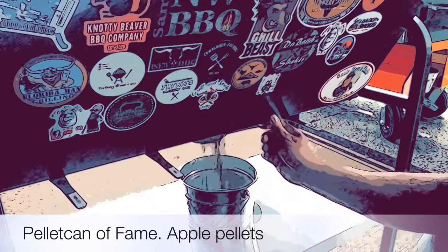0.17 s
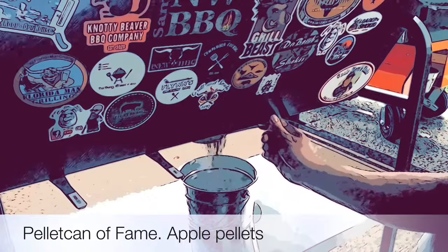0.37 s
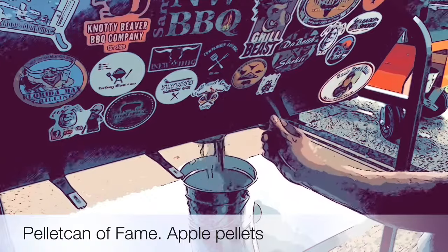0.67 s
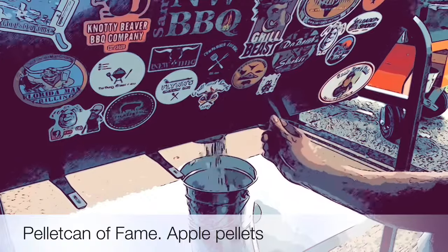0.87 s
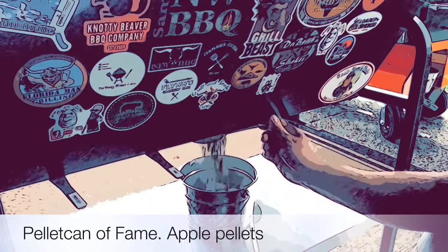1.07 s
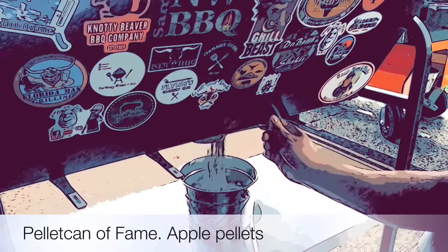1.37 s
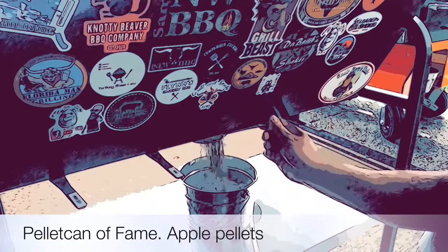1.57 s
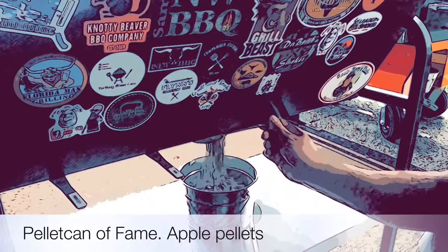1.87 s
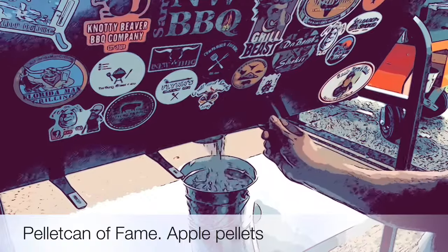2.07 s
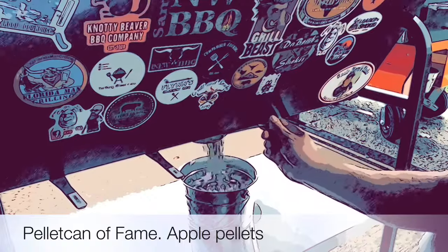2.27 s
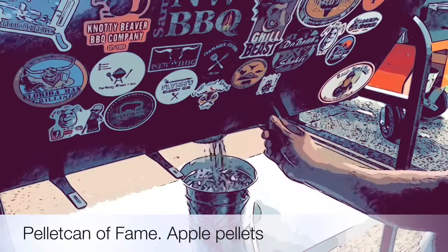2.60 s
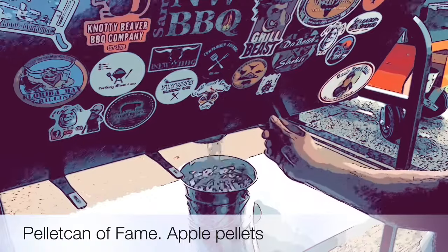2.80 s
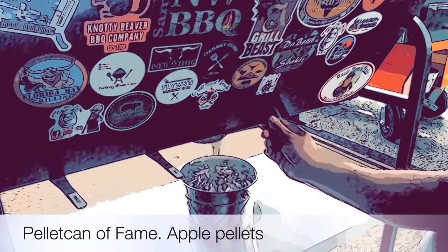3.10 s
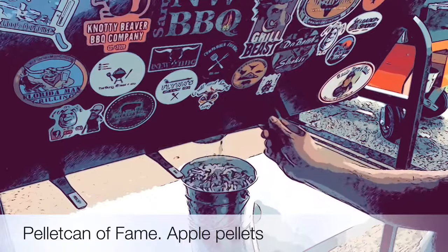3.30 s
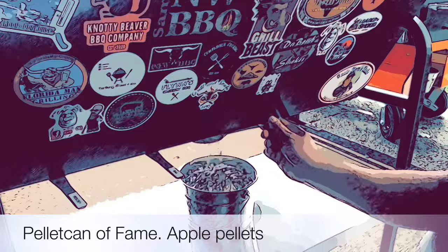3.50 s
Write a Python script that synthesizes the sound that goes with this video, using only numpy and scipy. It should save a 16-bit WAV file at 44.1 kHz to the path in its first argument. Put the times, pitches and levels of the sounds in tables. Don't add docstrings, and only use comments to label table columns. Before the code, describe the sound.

Wood pellets pour from a chute into a small metal can, bursting in loud and distorted, ringing the bare metal, then thinning to dry cracks and ticks; close phone microphone outdoors, faint hum.

```python
import sys
import numpy as np
from scipy import signal
from scipy.fft import rfft, irfft
from scipy.io import wavfile
from scipy.ndimage import uniform_filter1d

SR = 44100
rng = np.random.default_rng(int(sys.argv[2]) if len(sys.argv) > 2 else 0)


def file_out(sig):
    cols = np.atleast_2d(sig).T
    lim = np.clip(cols, -1, 1)
    pcm = np.round(lim * 32767).astype(np.int16)
    wavfile.write(sys.argv[1], SR, pcm)


def volts_from_db(level):
    exponent = np.asarray(level, float) / 20
    return 10 ** exponent


N = 160965


def read(points, hz):
    f, value = np.transpose(points)
    return np.interp(np.log(hz + 1), np.log(f + 1), value)


def evened(x):
    return x / np.sqrt(np.mean(x ** 2) + 1e-20)


def smooth_twice(x, size):
    return uniform_filter1d(uniform_filter1d(x, size), size)


def colour(x, points):
    length = x.shape[-1]
    hz = np.fft.rfftfreq(length, 1 / SR)
    return irfft(rfft(x) * volts_from_db(read(points, hz)), length)


def add(mix, s, sound):
    part = mix[round(s * SR):][:len(sound)]
    part += sound[:len(part)]


def resonate(x, hz, width):
    r = np.exp(-np.pi * width / SR)
    pole = r * np.exp(2j * np.pi * hz / SR)
    return 2 * signal.lfilter([1 - r], [1, -pole], x).real


def flow():
    # (time [s], level [dB])
    pour = [(0, -8.5), (.1, -9.5), (.125, -16.5), (.3, -20.5), (.4, -22), (.55, -18.5), (.8, -20.5),
            (1.05, -23), (1.2, -24), (1.5, -25.5), (2, -28), (2.33, -32), (2.6, -29), (3.1, -33.5),
            (3.2, -38), (3.45, -36), (3.65, -44)]
    return volts_from_db(np.interp(np.arange(N) / SR, *np.transpose(pour)))


def hail(count=24):
    ticks_per_s, spread_db, t60_s, surge_db = 1500, 3, 0.017, 0.6
    t = np.arange(1024) / SR
    lands = rng.random(N) < ticks_per_s / SR
    size = lands * volts_from_db(spread_db * np.minimum(rng.exponential(1, N), 4))
    kind = rng.integers(0, count, N)
    out = np.zeros(N)
    for k in range(count):
        hz = rng.uniform(100, 17000, (30, 1))
        phase = rng.random((30, 1))
        tick = np.sin(2 * np.pi * (hz * t + phase)).sum(0) * volts_from_db(-60 * t / t60_s)
        out += signal.oaconvolve(size * (kind == k), tick)[:N]
    surge = evened(smooth_twice(rng.standard_normal(N), 500))
    return evened(out) * volts_from_db(surge_db * surge)


def heap_hail(pour):
    # (frequency [Hz], level [dB per Hz])
    wooden_tone = [(400, -10), (1400, -3.5), (3000, 0.5), (6500, 1), (9200, 1.5), (9900, -9), (13500, -7),
                   (15600, -16)]
    return pour * evened(colour(hail(), wooden_tone))


def bare_metal(rain, pour):
    # (frequency [Hz], level [dB per Hz])
    metal_tone = [(40, -23), (200, -19), (620, 4), (1200, -2), (2700, 4), (9200, -5), (9900, -14),
                  (15600, -46)]
    start_db, fall_db_per_s = 4.5, -9
    covering = volts_from_db(start_db + fall_db_per_s * np.arange(N) / SR)
    return pour * covering * evened(colour(rain, metal_tone))


def can_body(rain, pour):
    # (frequency [Hz], width [Hz], level [dB], change [dB/s])
    can_tones = [(264.5, 11, -10, -0.5), (395.2, 12, -4, -1.5), (582, 56, 3.5, -6.5), (680, 48, -0.5, -2),
                 (973, 20, 1.5, -6.5), (1420, 6.7, 0, -0.5), (1556, 9.2, -10.5, 2.5), (1810, 13, -2.5, -2),
                 (2090, 38, 2, -3.5), (2290, 13, 5.5, -4), (2645, 11, -1, -0.5), (3250, 160, 3, 1)]
    t = np.arange(N) / SR
    drive = (rain + 0.85 * rng.standard_normal(N)) * pour * volts_from_db(-8.5)
    out = np.zeros(N)
    for hz, width, db, change in can_tones:
        even_width = np.sqrt(SR / (100 * width))
        out += volts_from_db(db + change * t) * resonate(drive, hz, width) * even_width
    return out


def hollow(x):
    start_hz, rise_hz_per_s, width_hz, level_db = 2610, 254, 326, -6
    hz = start_hz + rise_hz_per_s * np.arange(N) / SR
    turn = np.exp(2j * np.pi * np.cumsum(hz) / SR)
    r = np.exp(-np.pi * width_hz / SR)
    ringing = turn * signal.lfilter([1 - r], [1, -r], x / turn)
    return x + volts_from_db(level_db) * 2 * ringing.real


def drone():
    # (time [s], frequency [Hz], level [dB])
    bottom_tone = [(0.0, 261.6, -28.5), (0.28, 259.9, -39), (3.65, 267.2, -58.5)]
    t = np.arange(N) / SR
    s, hz, db = np.transpose(bottom_tone)
    waver_db = evened(smooth_twice(rng.standard_normal(N), 1500))
    wave = np.sin(2 * np.pi * np.cumsum(np.interp(t, s, hz)) / SR)
    return np.sqrt(2) * volts_from_db(np.interp(t, s, db) + waver_db) * wave


def outdoor_air():
    # (frequency [Hz], level [dB per Hz])
    air_tone = [(20, -5), (60, -2.5), (130, -3.5), (300, 0.5), (690, -3.5), (1300, -7), (5000, -19),
                (15500, -14)]
    mid, side = volts_from_db(-41.5) * evened(colour(rng.standard_normal((2, N)), air_tone))
    side = volts_from_db(-25) * signal.lfilter(*signal.butter(2, 700, fs=SR), side)
    return mid + np.array([side, -side])


def opening_side_noise():
    # (frequency [Hz], width [Hz])
    split_bands = [(5700, 560), (8500, 500)]
    level_db, length_s = -9, 0.028
    split = sum(resonate(rng.standard_normal(N), hz, width) for hz, width in split_bands)
    fade = np.maximum(1 - np.arange(N) / SR / length_s, 0)
    side = volts_from_db(level_db) * evened(split) * fade
    return np.array([side, -side])


def clump(s, db, t60, pitch):
    # (frequency [Hz], level [dB per Hz])
    crack_tone = [(500, -33), (1900, -10.5), (3600, -5), (9200, -2.5), (9900, -10.5), (13500, -13),
                  (15600, -22.5)]
    level_db, scatter_db, grit_db, snap_db, snap_db_per_s = -6, -1.5, 0, 6.5, -74
    pitch_db, pitch_width, lumpy_db = 4.5, 0.16, 3
    rise_s, snap_t60_s, full_t60_s, spread_share = 0.0004, 0.01, 0.062, 0.04
    t = np.arange(8192) / SR
    hz = np.fft.rfftfreq(8192, 1 / SR)
    noise, grit, lumps = rng.standard_normal((3, 8192))
    tone = read(crack_tone, hz)
    tone += pitch_db * np.exp(-0.5 * (np.log((hz + 1) / pitch) / pitch_width) ** 2)
    tone += lumpy_db * evened(smooth_twice(lumps, 150))[:len(hz)]
    body = evened(irfft(rfft(noise) * volts_from_db(tone)))
    gritty = volts_from_db(grit_db * evened(uniform_filter1d(grit, 50)))
    build = min(t60 / full_t60_s, 1) * (1 - np.exp(-t / (spread_share * t60)))
    scatter = build * gritty * volts_from_db(scatter_db - 60 * t / t60)
    snap = body * np.minimum(t / rise_s, 1) * volts_from_db(-60 * t / snap_t60_s)
    snap = volts_from_db(snap_db + snap_db_per_s * t60) * snap / abs(snap).max()
    return s - rise_s, volts_from_db(db + level_db) * (snap + body * scatter)


def clumps():
    # (time [s], peak [dB], scatter time to fall 60 dB [s],
    # pitch [Hz])
    clump_landings = [(0.1784, 4, 0.093, 3380), (0.2487, 1, 0.049, 5100), (0.34, 0, 0.054, 8400),
                      (0.433, -10, .04, 2400), (0.4798, -3.5, 0.078, 3030), (0.518, -18, .03, 3000),
                      (0.528, 3.5, 0.13, 5100), (0.5581, 3, 0.1, 4630), (0.612, -16, 0.039, 8000),
                      (0.6485, -1, 0.14, 5500), (.69, -1.5, 0.048, 8600), (0.72, -0.5, 0.06, 8600),
                      (.749, 4, 0.062, 5200), (0.773, -1.5, 0.096, 7000), (0.8091, 4, 0.24, 6000),
                      (0.87, -8, 0.045, 8000), (0.8798, 3.5, 0.12, 3000), (0.926, 2.5, 0.11, 7700),
                      (0.962, 2, 0.083, 6900), (1.009, -5, 0.071, 5450), (1.066, -27, .04, 6400),
                      (1.0869, -1.5, 0.093, 9150), (1.101, 0, 0.12, 8540), (1.1213, 2.5, 0.082, 6300),
                      (1.166, -8.5, .05, 2800), (1.2155, -1, 0.13, 8850), (1.2483, 0, 0.098, 6350),
                      (1.2958, -1.5, 0.039, 3600), (1.336, -12, .04, 6000),
                      (1.366, -2.5, 0.11, 6140), (1.419, 3.5, 0.079, 5950), (1.471, -3, 0.058, 6500),
                     (1.5112, -4.5, 0.027, 3070), (1.5342, -3.5, 0.13, 2600), (1.5535, -2.5, 0.078, 5830),
                     (1.579, -6.5, 0.076, 5950), (1.599, -2.5, 0.14, 6370), (1.621, -5.5, 0.095, 6640),
                     (1.6664, -2.5, 0.071, 5860), (1.682, -2, 0.09, 6300), (1.7172, -5, 0.1, 6700),
                     (1.7536, -3, 0.044, 5400), (1.7757, -5, .064, 6500), (1.799, -2, 0.066, 7000),
                     (1.8065, -3.5, 0.097, 6500), (1.838, -1, 0.043, 8100), (1.847, -1.5, 0.045, 7900),
                     (1.883, -9, 0.073, 6030), (1.9127, -8.5, 0.091, 8340), (1.929, -9, 0.032, 6460),
                     (1.95, -4.5, .05, 9000), (1.9755, -6, 0.05, 6600), (2.0055, -9, 0.046, 4310),
                     (2.0175, -4.5, 0.066, 7700), (2.0649, -14, 0.069, 6410), (2.087, -9.5, 0.06, 7160),
                     (2.1, -1, 0.056, 7030), (2.141, -9, 0.062, 9400), (2.149, -8.5, 0.056, 8500),
                     (2.158, -13, 0.041, 3200), (2.1827, 0, 0.043, 5000), (2.204, -5, 0.055, 8790),
                     (2.2352, -5, 0.047, 7180), (2.2543, -10, .04, 8980), (2.267, -12.5, 0.066, 8050),
                     (2.293, -9, 0.048, 3680),
                      (2.313, -11, 0.052, 7900), (2.3476, -2.5, 0.057, 8200), (2.3708, -5, 0.067, 9040),
                   (2.4142, -1.5, 0.052, 8600), (2.487, -4, 0.031, 8700), (2.5199, -2, 0.063, 8600),
                   (2.635, -15, 0.041, 5500), (2.6506, -6, 0.07, 5170), (2.693, 1, 0.073, 8600),
                   (2.738, -3.5, 0.055, 6100), (2.784, -15.5, 0.071, 8850), (2.8142, -27, .02, 6350),
                   (2.83, -2.5, 0.039, 6450), (2.8477, -12, 0.084, 7540), (2.879, -10.5, .03, 8560),
                   (2.8924, -7.5, 0.07, 3720), (2.9374, -6.5, 0.058, 7700), (2.9883, -12.5, 0.062, 8200),
                   (3.0135, -6, 0.039, 5400), (3.0652, -13, 0.042, 4360), (3.096, -7, .1, 3700),
                   (3.157, -12.5, .015, 7900), (3.218, -13, 0.028, 5600), (3.2493, -8.5, 0.053, 8740),
                   (3.2708, -13, 0.062, 3580), (3.333, -7, 0.053, 4400), (3.4165, -12, 0.023, 2870),
                   (3.515, -13, 0.073, 5080), (3.539, -6.5, 0.042, 3840), (3.6089, -14, 0.029, 2770)]
    # (time [s], peak [dB], pitch [Hz])
    further_landings = [(0.289, -17, 9000), (.365, -4, 5900), (0.836, -6, 5000), (1.253, 1.5, 5960),
                        (1.3027, 1.5, 5840), (1.413, -3.5, 3000), (2.1113, -4, 8500), (2.382, -7.5, 7540),
                        (2.423, -9, 8500), (2.478, -26, 8000), (2.526, -6.5, 6000), (2.5707, -12.5, 3000),
                        (2.688, -12, 6000), (2.7, -11, 3570), (2.7401, -5, 9000), (3.0242, -12, 3770),
                        (3.1327, -18, 2800), (3.385, -18.5, 3250), (3.5451, -12.5, 5000), (3.623, -15, 8500),
                        (3.636, -16, 3900)]
    out = np.zeros(N)
    for row in clump_landings:
        add(out, *clump(*row))
    for s, db, pitch in further_landings:
        add(out, *clump(s, db, 0.071, pitch))
    return out


def knock(s, db, hz):
    level_db, t60_s = -3, 0.027
    t = np.arange(4096) / SR
    wave = np.sin(2 * np.pi * hz * t)
    wave += 0.65 * np.sin(2 * np.pi * 1.415 * hz * t)
    wave += 0.5 * np.sin(2 * np.pi * 0.64 * hz * t)
    return s - 0.001, volts_from_db(db + level_db - 60 * t / t60_s) * np.minimum(t / 0.0022, 1) * wave / 2


def knocks():
    # (time [s], peak [dB], pitch [Hz])
    bottom_blows = [(.195, -2, 700), (.232, 0, 680), (0.26, 3, 655), (0.318, 2.5, 540), (0.432, 5.5, 655),
                    (0.777, -4, 657), (0.809, -4, 663), (0.879, -10, 1450), (1.919, -11, 1420),
                    (2.181, -13, 1900), (3.413, -13, 1515), (3.414, -11, 2730)]
    out = np.zeros(N)
    for row in bottom_blows:
        add(out, *knock(*row))
    return out


def rim(s, db, share):
    # (frequency [Hz], level [dB], time to fall 60 dB [s])
    rim_tones = [(3435, -12, .12), (3570, -7, .15), (3720, 1, .07), (3897, -8, .06), (4086, -2, .2),
                 (4324, -3, .2), (4530, -12, .12), (5085, -7, .07), (5212, -9, .08)]
    t = np.arange(8192) / SR
    ring = np.zeros(8192)
    for hz, tone_db, t60_s in rim_tones:
        luck_db = 2.5 * rng.standard_normal()
        phase = rng.standard_normal()
        fading = volts_from_db(tone_db + luck_db - 60 * t / (share * t60_s))
        ring += fading * np.sin(2 * np.pi * (hz * t + phase))
    shake = volts_from_db(1.8 * evened(uniform_filter1d(rng.standard_normal(8192), 200)))
    return s, volts_from_db(db) * np.minimum(t / 0.0018, 1) * shake * ring


def rim_strikes():
    # (time [s], level [dB], share of the free ringing time [0-1])
    rim_hits = [
        (2.53, -24, 0.54),
        (2.697, -18, 0.8),
        (2.9, -29, 0.7),
        (3.027, -27, 0.6),
        (3.066, -31, 1),
        (3.099, -31, 0.8),
        (3.335, -27.5, 0.9),
        (3.416, -26, 0.43),
        (3.54, -25.5, 1),
        (3.636, -36, 0.5),
    ]
    out = np.zeros(N)
    for row in rim_hits:
        add(out, *rim(*row))
    return out


def scene():
    pour = flow()
    metal_rain = hail()
    can = bare_metal(metal_rain, pour) + can_body(metal_rain, pour) + drone()
    inside = hollow(heap_hail(pour) + clumps() + knocks() + rim_strikes())
    return inside + can + outdoor_air() + opening_side_noise()


def gated(x):
    gate_hz, gate_db = 13900, 0.3
    hz, _, z = signal.stft(x, SR, nperseg=1024, noverlap=768)
    power = (abs(z) ** 2).mean(0)
    power = uniform_filter1d(power, size=16, axis=0)
    power = uniform_filter1d(power, size=4, axis=1)
    level_db = 10 * np.log10(power + 1e-20)
    slow_db = uniform_filter1d(level_db, size=60, axis=1)
    shut = (level_db < slow_db + gate_db) & (hz[:, None] > gate_hz)
    return signal.istft(z * ~shut, SR, nperseg=1024, noverlap=768)[1][:, :N]


def low_pass(x):
    return signal.sosfilt(signal.butter(12, 15660, fs=SR, output="sos"), x)


def record(dry):
    limit = volts_from_db(1.5)
    mix = gated(np.clip(dry, -limit, limit))
    return low_pass(mix)


dry = scene()
out = record(dry)
file_out(out)
```